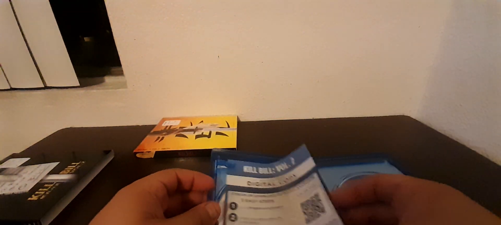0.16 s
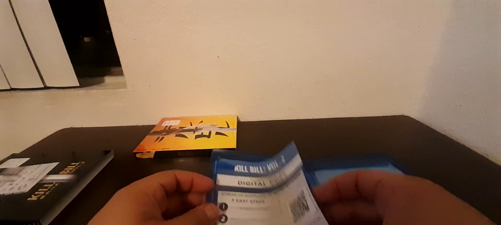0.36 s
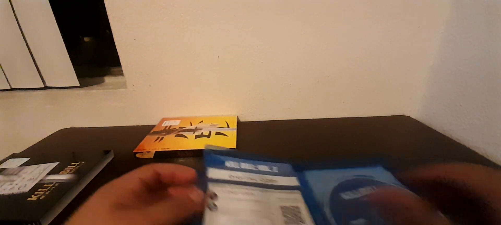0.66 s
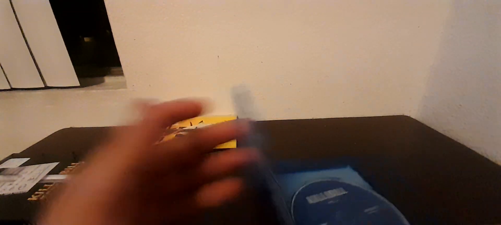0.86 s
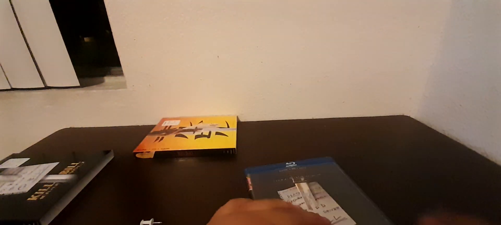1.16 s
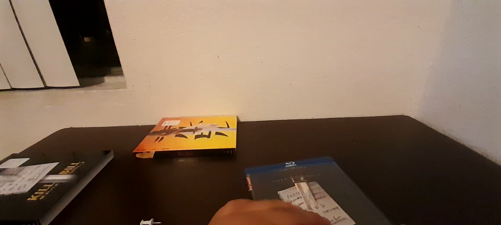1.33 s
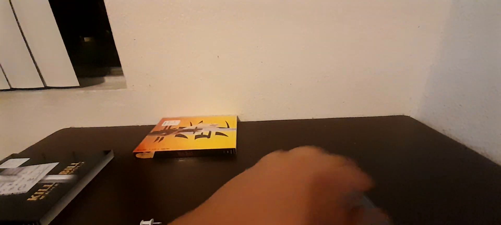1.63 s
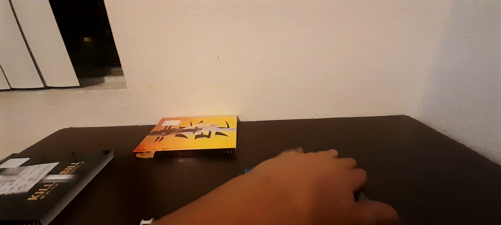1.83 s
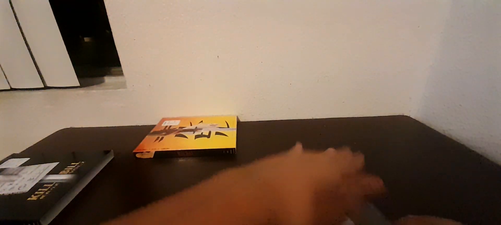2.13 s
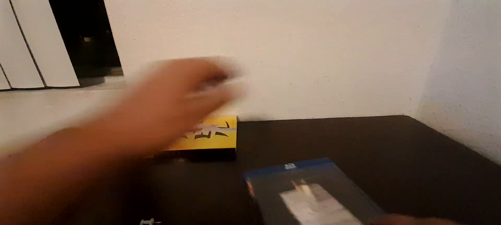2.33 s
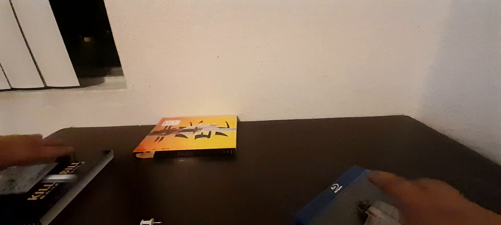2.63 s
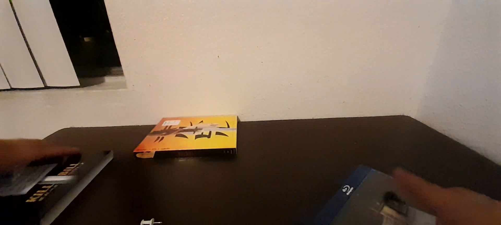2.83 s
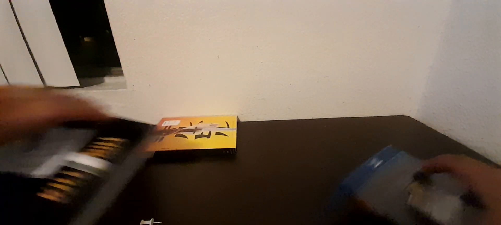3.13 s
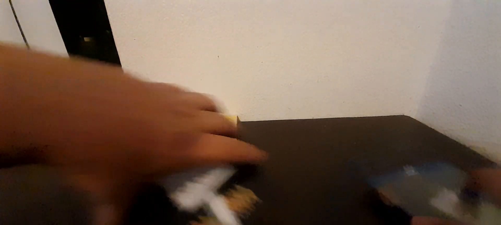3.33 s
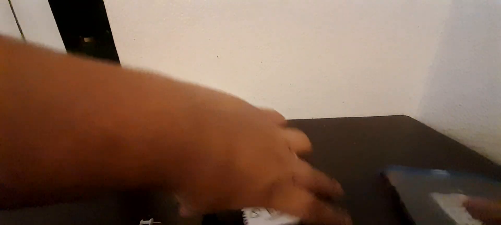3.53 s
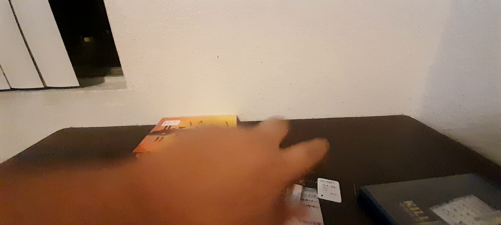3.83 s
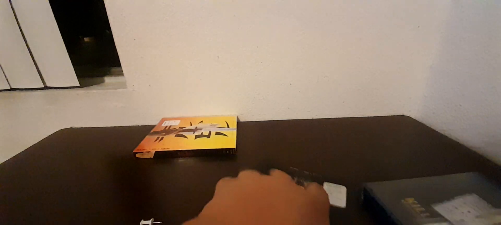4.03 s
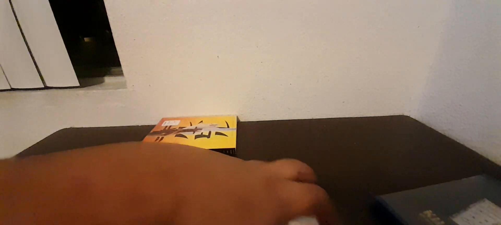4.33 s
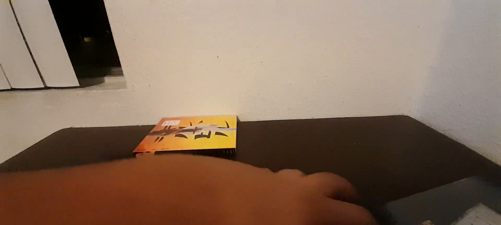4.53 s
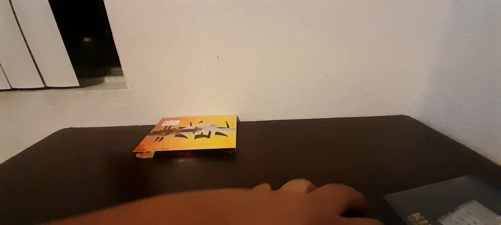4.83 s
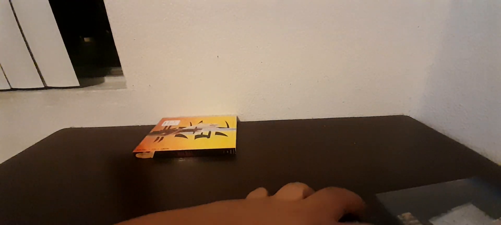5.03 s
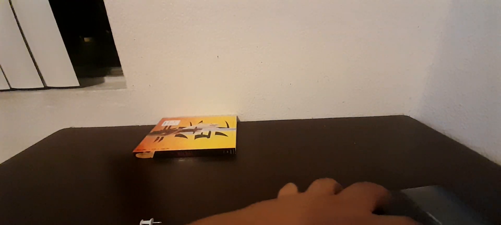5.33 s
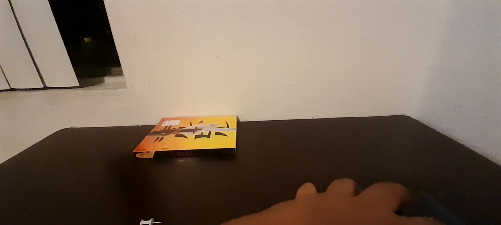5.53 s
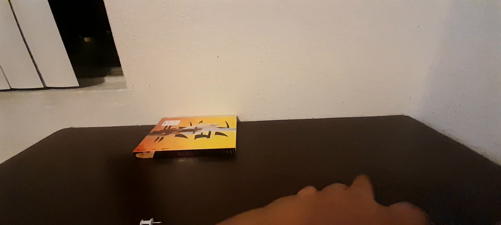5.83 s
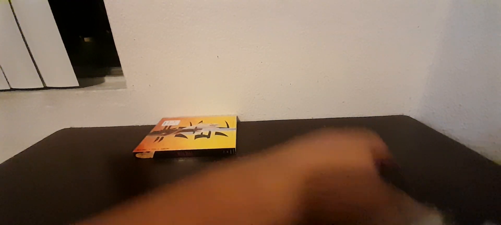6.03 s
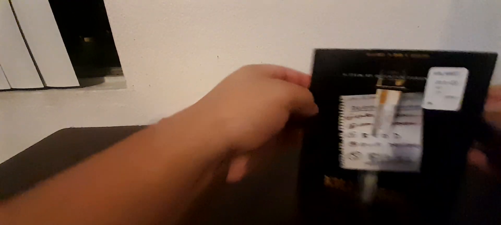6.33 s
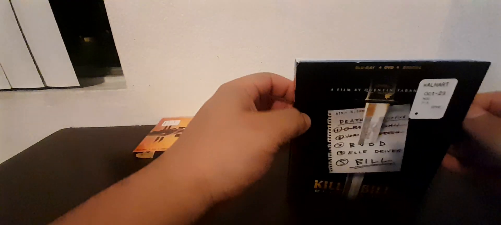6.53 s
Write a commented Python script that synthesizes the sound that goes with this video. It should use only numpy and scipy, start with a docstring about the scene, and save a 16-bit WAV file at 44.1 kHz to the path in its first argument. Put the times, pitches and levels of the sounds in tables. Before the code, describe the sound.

Close to a stereo phone microphone in a small room, plastic cases are rubbed and clicked, then snapped shut and knocked onto a wooden table. Sliding and scraping follow, with sharp mid-stretch raps, thin finger squeaks, and brighter rustling swells. Two heavy, dull table thuds come near the end. A low wavering hum, faint motor tone and soft hiss stay underneath.

```python
"""A low wavering hum, faint hiss and soft rubbing come first; then plastic cases and a cardboard sleeve snap, slide,
squeak and land on a wooden table, close to a phone with two microphone ports.
Each contact rattles the plastic, rings the hollow case and thuds the table top, and a small room answers.
Rubbing and rattling are swells of coloured noise, some of which prolong the sound after a contact.
The house hum, a far motor and microphone hiss lie beneath."""
import sys
import numpy as np
from scipy import signal
from scipy.fft import rfft, irfft, next_fast_len
from scipy.io import wavfile
from scipy.ndimage import uniform_filter1d

SR = 44100
rng = np.random.default_rng(int(sys.argv[2]) if len(sys.argv) > 2 else 0)


def master(y):
    """Save y as 16-bit WAV."""
    cut = np.clip(np.atleast_2d(y).T, -1, 1)
    pcm = np.round(cut * 32767)  # scale
    wavfile.write(sys.argv[1], SR, pcm.astype(np.int16))


N = 294588


def amp(db):
    """dB to gain."""
    return 10 ** (np.asarray(db) / 20)


def unit(x):
    """Scaled to rms 1."""
    return x / np.sqrt(np.mean(x ** 2) + 1e-20)


def peak(x):
    """Scaled to a highest swing of 1."""
    return x / np.abs(x).max()


def along(points, hz):
    """(Hz, value) points interpolated on a log frequency axis."""
    f, v = np.transpose(points)
    return np.interp(np.log(hz + 1), np.log(f + 1), v)


def filtered(x, response):
    """x times a complex response of frequency."""
    n = x.shape[-1]
    m = next_fast_len(n + 8192)  # room for the filter's tail
    return irfft(rfft(x, m) * response(np.fft.rfftfreq(m, 1 / SR)), m)[..., :n]


def resonant(peaks):
    """The causal response of (Hz, width Hz, dB) resonances in alternating polarity."""
    def response(hz):
        total = 0
        for k, (centre_hz, width_hz, db) in enumerate(peaks):
            damping = 1j * hz * width_hz
            total = total + (-1) ** k * amp(db) * damping / (centre_hz ** 2 - hz ** 2 + damping)
        return total
    return response


# Likeness of the two ports. Each row: frequency in Hz, left-right correlation (1 is identical).
PORT_LIKENESS = [(60, 1), (180, 0.91), (550, 0.0036), (1650, 0.14), (4970, -0.0079), (15000, 0.05)]


def paired(pair, response):
    """Two unrelated noises, coloured and mixed so that the ports agree in the bass only."""
    def mid_side(hz):
        turn = np.arccos(np.clip(along(PORT_LIKENESS, hz), -1, 1)) / 2
        return response(hz) * np.array([np.cos(turn), np.sin(turn)])
    mid, side = filtered(pair, mid_side)
    return np.array([mid + side, mid - side])


def rush(response, patchy_db, size=(6, 8)):
    """Stereo noise of rms 1 with patches of random gain, smoothed over size = (frequency bins, frames)."""
    z = signal.stft(rng.standard_normal((2, N)), nperseg=512)[2]
    field = uniform_filter1d(rng.standard_normal(z.shape[1:]), size=size[0], axis=0)
    field = uniform_filter1d(field, size=size[1], axis=1)
    noise = signal.istft(z * amp(patchy_db * unit(field)), nperseg=512)[1][:, :N]
    return unit(paired(noise, response))


# Resonances of the house hum. Each row: centre in Hz, width in Hz, relative level in dB.
HUM_PEAKS = [(57.94, 11.7, 3.5), (130.7, 27.3, -6.5), (175, 16.5, -10.5), (242.6, 11, -9.5),
             (317.5, 90, -22.5)]


def house_hum():
    """Noise through low resonances, rolled off above 450 Hz; random gain patches make it waver."""
    return amp(-41) * rush(lambda hz: resonant(HUM_PEAKS)(hz) / (1 + (hz / 450) ** 4), patchy_db=1.5)


# Drifting motor tone. Each row: time in seconds, frequency in Hz.
MOTOR_PITCH = [(0, 180), (1.3, 173), (2.5, 173), (3, 176), (4.5, 180), (6, 185), (6.68, 187)]


def far_motor():
    """A drifting sine and its weaker octave."""
    time_s, pitch_hz = np.transpose(MOTOR_PITCH)
    phase = 2 * np.pi * np.cumsum(np.interp(np.arange(N) / SR, time_s, pitch_hz)) / SR
    return amp(-53) * np.sin(phase) + amp(-65.5) * np.sin(2 * phase)


# Colour of the microphone hiss. Each row: frequency in Hz, relative spectral density in dB.
MIC_HISS = [(290, -32), (500, -2), (869, -3), (1130, -16), (3170, -21), (3670, -12), (7490, -15),
            (9180, -22), (15300, -23), (16200, -28)]


def microphone_hiss():
    """Steady coloured noise of the microphones."""
    return amp(-74) * rush(lambda hz: amp(along(MIC_HISS, hz)), patchy_db=.6)


def background():
    """House hum, far motor and microphone hiss."""
    return house_hum() + far_motor() + microphone_hiss()


SWING_DB = 20  # level change in one rise or fall time


def swells(full_s, rise_s, hold_s, fall_s, db):
    """The power-summed gain of swells that rise, hold and fall along straight lines in dB."""
    t = np.arange(0, N + 32, 32) / SR
    power = 0
    for full, rise, hold, fall, level_db in np.broadcast(full_s, rise_s, hold_s, fall_s, db):
        away = np.maximum(np.maximum((full - t) / rise, (t - full - hold) / fall), 0)
        power = power + amp(2 * (level_db - SWING_DB * away))
    return np.interp(np.arange(N) / SR, t, np.sqrt(power))


# Narrow resonances of the sliding lid. Each row: centre in Hz, width in Hz, dB against the broad rubbing.
LID_PEAKS = [(797, 52, 8), (1300, 90, -1.5), (1785, 72, 6.5), (2150, 120, 6), (2540, 25, 4),
             (3380, 120, -2.5), (5000, 180, 4), (7300, 180, 2.5)]


def lid_gain(hz):
    """The lid's resonances add their power to the broad rubbing."""
    return np.sqrt(1 + abs(resonant(LID_PEAKS)(hz)) ** 2)


# Colour of the rubbing hiss. Each row: frequency in Hz, relative spectral density in dB.
RUB_HISS = [(2350, -36.5), (4000, -6.5), (5210, -10.5), (5720, -4.5), (6100, -6), (6850, -4), (9460, -15),
            (11300, -13), (15100, -12), (16200, -27)]


def rub_hiss():
    """Bright noise coloured by the lid."""
    return rush(lambda hz: amp(along(RUB_HISS, hz)) * lid_gain(hz), patchy_db=.6)


# Colour of the scrape. Each row: frequency in Hz, relative spectral density in dB.
SCRAPE_COLOUR = [(650, -12.5), (1100, -7), (1280, -6.5), (1980, -12.5), (2220, -11.5), (2740, -11.5),
                 (3320, -8), (4800, -15.5), (6240, -24.5), (10600, -120)]


def rub_scrape():
    """Noise coloured by the lid, streaked by patches narrow in pitch and long in time."""
    return rush(lambda hz: amp(along(SCRAPE_COLOUR, hz)) * lid_gain(hz), patchy_db=2.2, size=(2, 16))


# Modes of the hollow case, also rung by contacts. Each row: frequency in Hz, relative level in dB, t60 in seconds.
CASE_MODES = [(625, -2, .035), (740, 0, .06), (830, -3, .03), (964, -3, .025), (1130, -3, .025),
              (1310, -2, .025), (1480, -4, .02)]


def case_drone():
    """Noise through the case modes, those near 810 Hz favoured."""
    peaks = [(hz, 4 / t60_s, db - 30 * abs(np.log2(hz / 810))) for hz, db, t60_s in CASE_MODES]
    return rush(resonant(peaks), patchy_db=1.5)


# Finger squeaks on the glossy cover.
# Each row: full level at in seconds, hold in seconds, pitch in Hz, drive in dB before the resonance.
SQUEAK_EVENTS = [(2.76, .24, 5000, -50), (2.76, .26, 7300, -49), (4.095, .01, 3380, -26.5),
                 (4.175, .015, 3380, -27), (4.3, 0.051, 3306, -32)]
SQUEAK_RISE_S, SQUEAK_FALL_S = 0.027, 0.036
SQUEAK_WIDTH = 0.055  # share of the pitch


def squeaks():
    """Friction noise through a narrow resonance, applied twice, at each squeak's pitch."""
    friction, total = rush(lambda hz: 1, patchy_db=0.5), 0
    for full_s, hold_s, pitch_hz, db in SQUEAK_EVENTS:
        drive = swells(full_s, SQUEAK_RISE_S, hold_s, SQUEAK_FALL_S, db) * friction
        tone = resonant([(pitch_hz, SQUEAK_WIDTH * pitch_hz, 0)])
        total = total + filtered(drive, lambda hz: tone(hz) ** 2)
    return total


CATCHES_PER_S, CATCH_DB, CATCH_SPREAD_DB = 20, 25, 1.5  # mean rate; impulse over scrape gain, before the resonance


def edge_catches(scrape_gain):
    """An edge catches at random times: impulses that follow the scrape, through a broad 2600 Hz resonance."""
    height = amp(CATCH_DB + CATCH_SPREAD_DB * rng.standard_normal((2, N)))
    impulses = (rng.random(N) < CATCHES_PER_S / SR) * height
    return filtered(scrape_gain * impulses, lambda hz: resonant([(2600, 3000, 0)])(hz) ** 2)


# Swells of rubbing and rattling noise; some prolong the sound after a contact.
# Each row: full level at in seconds, rise in seconds, hold in seconds, fall in seconds,
# base level in dB, scrape over base in dB, drone over base in dB.
NOISE_SWELLS = [(0.0, .05, 0.033, 0.077, -56, 8.5, -4.5), (0.137, 0.013, 0.0066, .055, -58, 9, -19),
                (0.217, 0.015, 0.025, .1, -61, 8.5, -3), (0.301, 0.049, 0.0081, 0.13, -54.5, 7, -2),
                (0.566, 0.073, 0.015, 0.12, -54.5, 0.5, -10.5),
                (0.951, 0.73, 0.082, .22, -56.5, 0.5, -18.5), (1.194, 0.066, 0.029, 0.04, -60, 13, -1),
                (1.322, 0.019, .005, 0.073, -63.5, 0.5, 13), (1.539, 0.059, 0.036, 0.079, -55.5, 12.5, 5),
                (1.684, .1, 0.058, 0.29, -70.5, 2.5, -27.5), (1.95, 0.15, 0.024, 0.13, -70.5, -1.5, 2.5),
                (2.089, 0.18, 0.03, 0.046, -62, 3, -13.5), (2.179, 0.022, 0.0044, 0.036, -60.5, -4, 0),
                (2.248, 0.069, .005, 0.049, -63.5, 0, 8.5), (2.372, 0.01, .005, 0.04, -61, -4.5, 5.5),
                (2.506, 0.09, 0.059, 0.15, -51.5, 4.5, 5), (2.881, 0.12, .02, 0.22, -59.5, 5, 4.5),
                (3.14, 0.0067, 0.0044, 0.065, -61.5, 22.5, 15), (3.247, 0.058, .03, 0.18, -72.5, 3.5, 8),
                (3.583, 0.1, 0.22, .12, -51, 3, 1.5), (3.687, .004, 0.054, 0.055, -44.5, 12, 9),
                (4.086, 0.027, 0.21, .1, -63.5, 10, -3), (4.323, 0.19, 0.0077, 0.1, -54.5, 10, 2),
                (4.431, .1, 0.0045, 0.23, -63.5, 9, 10), (4.619, 0.15, .005, 0.14, -57, 10, -1.5),
                (4.06, .004, .005, 0.033, -66.5, 6, -13), (4.73, 0.11, 0.056, 0.13, -66.5, 8, -1.5),
                (4.967, 0.21, .005, 0.2, -65, 6.5, 4.5), (5.284, 0.21, 0.097, 0.13, -43.5, 2.5, -5),
                (5.579, 0.16, 0.0035, 0.045, -43, 3.5, -17.5),
                (5.823, 0.058, 0.019, 0.045, -52.5, -1, -6.5),
                (6.129, 0.024, 0.037, 0.044, -61.5, -4, -16.5), (6.206, 0.016, 0.0034, 0.065, -48, -2, -14),
                (6.298, 0.035, 0.037, 0.042, -61, -2, 4), (6.62, 0.32, .06, 0.12, -74, 8, 8)]
HISS_DB = 3.5  # hiss over a swell's base level


def rubbing():
    """Swells of hiss, scrape and drone, with squeaks, flickered by dense tiny slips; catches tick on top."""
    *shape, base_db, scrape_db, drone_db = np.transpose(NOISE_SWELLS)
    slips = unit(amp(16 * uniform_filter1d(rng.standard_normal(N), size=90)))
    scrape_gain = swells(*shape, base_db + scrape_db)
    hiss = swells(*shape, base_db + HISS_DB) * rub_hiss()
    scrape = scrape_gain * rub_scrape()
    drone = swells(*shape, base_db + drone_db) * case_drone()
    rubbed = slips * (hiss + scrape + drone + squeaks())
    return (rubbed + edge_catches(scrape_gain)) * amp([[.6], [-.6]])


def ring(modes, t, attack_s, colour_hz, slope_db):
    """Damped modes with scattered strengths, weakened by slope_db per octave from the colour (negative boosts)."""
    scatter_db = 2.5 * rng.standard_normal(len(modes))
    x = 0
    for (hz, db, t60_s), more_db in zip(modes, scatter_db):
        strength_db = db + more_db - slope_db * abs(np.log2(hz / colour_hz))
        x = x + amp(strength_db - 60 * t / t60_s) * np.sin(2 * np.pi * hz * t)
    return peak(x * (1 - np.exp(-t / attack_s)))


def panel(t, length_s, response):
    """A panel's rattle at both ports, and a single blow of equal energy, as the walls blur it."""
    envelope = amp(-60 * t / np.clip(length_s, .001, .05)) * (1 - np.exp(-t / .0002))
    rattle = rng.standard_normal((3, len(t))) * envelope
    # the panel radiates unevenly: each port gets part of the rattle for itself
    direct = peak(filtered(rattle[0] + .7 * rattle[1:], response))
    blow = unit(filtered((t == 0) * 1.0, response)) * np.sqrt(np.mean(direct ** 2))
    return direct, blow


# Decay of the room. Each row: frequency in Hz, t60 in seconds.
ROOM_DECAY = [(150, 0.27), (400, 0.14), (1000, 0.15), (3000, 0.16), (8000, 0.21), (15000, 0.17)]


def echo(x, gap_s):
    """The room's answer: noise that builds up over the gap, each frequency dying at its own speed."""
    n = len(x)
    hz, t, z = signal.stft(rng.standard_normal((2, n)), SR, nperseg=256)
    decay = amp(-60 * t / along(ROOM_DECAY, hz)[:, None])
    tail = signal.istft(z * decay, SR, nperseg=256)[1][:, :n]
    onset = 1 - np.exp(-(np.arange(n) / SR / gap_s) ** 2)
    tail = paired(tail * onset, lambda hz: 1)
    return signal.fftconvolve(x[None], tail / np.linalg.norm(tail[0]), axes=1)[:, :n]


# Table top modes. Each row: frequency in Hz, relative level in dB, t60 in seconds.
TABLE_MODES = [(143.5, -24, 0.54), (173.9, -13.5, 0.19), (192.4, 1, 0.085), (213.7, -14.5, 0.28),
               (247, -13, 0.13), (351.5, -21, 0.16), (403.5, -14.5, 0.064)]
# Thin plastic edges. Each row: centre in Hz, width in Hz, relative level in dB.
EDGE_PEAKS = [(5230, 1790, 11.5), (8060, 1700, 9), (11800, 36000, -2)]
# Contacts, with peak levels before panning and room. Each row: start in seconds, table thud in dB,
# hollow case in dB, case colour in Hz, rap in dB, rap colour in Hz, tick in dB,
# left over right in dB, rattle t60 in seconds.
CONTACT_EVENTS = [(0.162, -68, -39.5, 1270, -31.5, 2150, -55, 7.5, 0.0021),
                  (0.321, -35.5, -34.5, 970, -23, 2260, -43, 12, 0.017),
                  (0.411, -57, -45, 1310, -39, 1470, -57, 21.5, 0.0085),
                  (0.439, -44, -27, 1050, -8, 4060, -30.5, 11.5, 0.013),
                  (0.486, -39, -36.5, 1230, -31, 3810, -43.5, 3, 0.0025),
                  (0.543, -59, -42, 1380, -28.5, 2780, -31, 6.5, 0.017),
                  (0.576, -43, -44, 1410, -27.5, 1640, -39.5, 8.5, 0.0056),
                  (0.606, -44, -29, 1320, -20, 3100, -19, 11.5, 0.035),
                  (0.896, -20, -40, 700, -55, 2500, -66, 4, 0.0046),
                  (1.189, -18, -17.5, 913, -20, 2340, -17.5, 4.5, 0.012),
                  (1.321, -32.5, -44, 845, -41, 4600, -37.5, 6.5, 0.007),
                  (1.475, -51.5, -47, 1300, -41.5, 1930, -35, -2, 0.036),
                  (1.506, -27.5, -10.5, 1210, -13.5, 2690, -1.5, 5.5, 0.025),
                  (1.936, -40, -47.5, 860, -68, 2490, -80, 13.5, 0.006),
                  (1.957, -49, -48, 780, -48, 1850, -52.5, 3.5, 0.008),
                  (2.011, -10.5, -9.5, 900, -18.5, 2700, -7, 4, 0.033),
                  (2.128, -62, -47, 706, -49.5, 2500, -42.5, 3.5, 0.008),
                  (2.191, -41, -57, 600, -63, 4500, -34, 1.5, 0.0037),
                  (2.255, -41, -65, 754, -45, 1790, -58, 15.5, 0.0086),
                  (2.363, -44, -51, 610, -71, 3930, -45.5, -1, 0.008),
                  (2.715, -44, -58, 600, -71, 4400, -39.5, -14.5, 0.0088),
                  (2.849, -37, -41.5, 630, -55, 1810, -63.5, 4, 0.0092),
                  (3.139, -38.5, -33.5, 670, -31, 1860, -22, 0.5, 0.0036),
                  (3.456, -14, -20, 610, -9, 3210, -2.5, -4, 0.0092),
                  (3.484, -19.5, -18, 830, -18.5, 2370, -8.5, -8, 0.018),
                  (3.681, -24.5, -13, 1270, -2, 2560, -36.5, 9.5, 0.011),
                  (3.811, -40, -52, 820, -33.5, 2820, -30.5, -11, 0.012),
                  (4.103, -62, -62.5, 775, -41.5, 3290, -66, 1.5, 0.011),
                  (4.181, -62, -47, 1330, -35.5, 3370, -65, -3, 0.006),
                  (4.255, -60, -28, 800, -29, 3360, -51, 3, 0.031),
                  (4.286, -64, -51, 775, -44.5, 3300, -50.5, 8.5, 0.0056),
                  (4.361, -57, -44, 750, -50, 3310, -36, 9, 0.0046),
                  (4.579, -45, -31, 1300, -34.5, 1520, -27.5, 8.5, 0.023),
                  (4.611, -59, -39, 1010, -38, 2150, -33, -2, 0.007),
                  (4.796, -47, -49.5, 607, -44.5, 2250, -70, 7, 0.006),
                  (5.087, -42.5, -35, 850, -38, 2480, -46, 2, 0.0089),
                  (5.266, -61, -28.5, 950, -48.5, 2400, -39, 2, 0.0034),
                  (5.276, -61, -40, 774, -61, 4500, -7.5, 7, 0.012),
                  (5.287, -27.5, -29.5, 670, -26, 1960, -16.5, -1.5, 0.022),
                  (5.6, -30, -22, 643, -23, 2430, -9.5, 4.5, 0.023),
                  (5.924, -56, -60.5, 600, -52.5, 4085, -54, 0.5, 0.013),
                  (6.036, -58, -56, 782, -48, 4010, -53.5, -1.5, 0.0047),
                  (6.21, -63.5, -49.5, 920, -38.5, 3590, -37, 2.5, 0.0055),
                  (6.515, -5, -15.5, 607, -26, 1746, -26.5, 2, 0.039),
                  (6.569, -11, -12, 665, -31, 2650, -25, 0, 0.015)]
ROOM_DB = -0.5  # gain of the room's answer


def contacts():
    """Each contact raps the lid, ticks its edges, rings the hollow case, thuds the table and stirs the room."""
    out, t = np.zeros((2, N + SR)), np.arange(SR // 3) / SR
    for start_s, thud_db, case_db, case_hz, rap_db, rap_hz, tick_db, pan_db, length_s in CONTACT_EVENTS:
        def lid(hz):
            # broad resonance, applied twice for steep flanks and dulled above
            return resonant([(rap_hz, .9 * rap_hz, 0)])(hz) ** 2 / (1 + 1j * hz / (2 * rap_hz)) ** 2

        rap, far_rap = panel(t, length_s, lid)
        tick, far_tick = panel(t, length_s, resonant(EDGE_PEAKS))
        case = amp(case_db) * ring(CASE_MODES, t, attack_s=0.0006, colour_hz=case_hz, slope_db=22)
        thud = amp(thud_db) * ring(TABLE_MODES, t, attack_s=0.0027, colour_hz=200, slope_db=-6)

        to_room = amp(rap_db) * far_rap + 0.44 * amp(tick_db) * far_tick + case + 0.34 * thud
        room = amp(ROOM_DB) * echo(to_room, gap_s=0.0005) * amp([[pan_db / 4], [-pan_db / 4]])
        plastic = amp(rap_db) * rap + amp(tick_db) * tick + case
        plastic = plastic * amp([[pan_db / 2], [-pan_db / 2]])
        plastic[0] = np.roll(plastic[0], 4)  # samples: the left port is a little farther away
        first = round(start_s * SR)
        out[:, first:first + len(t)] += plastic + thud + room
    return out[:, :N]


def scene():
    """Everything that reaches the two ports."""
    return background() + rubbing() + contacts()


TOP_HZ = 15950


def record(dry):
    """The deepest bass is cut, and nothing sounds above TOP_HZ."""
    return filtered(dry, lambda hz: (1j * hz / (1j * hz + 40)) ** 2 * (hz < TOP_HZ))


dry = scene()
out = record(dry)
master(out)
```